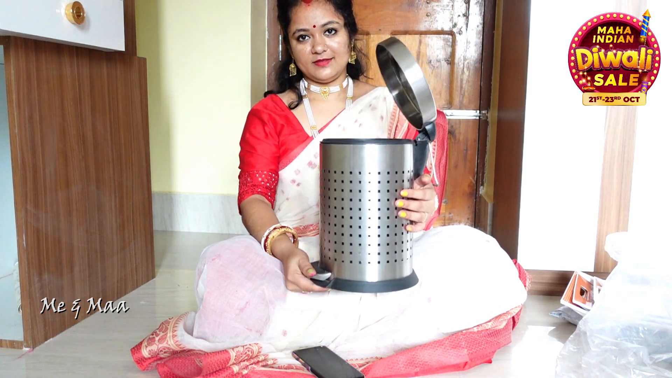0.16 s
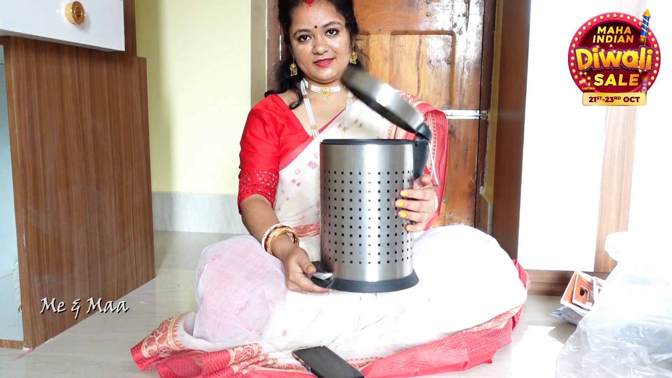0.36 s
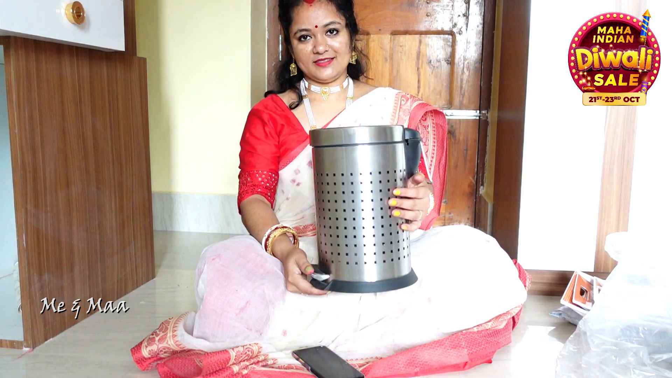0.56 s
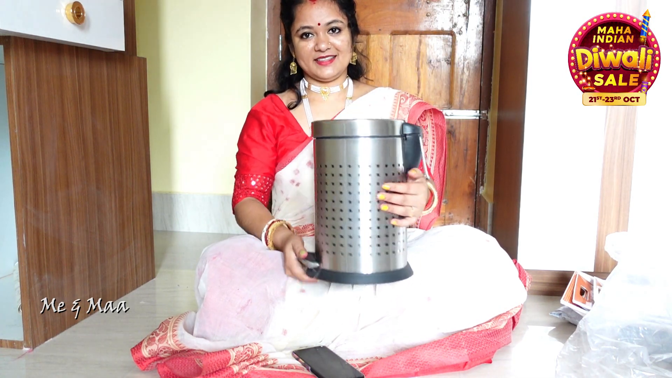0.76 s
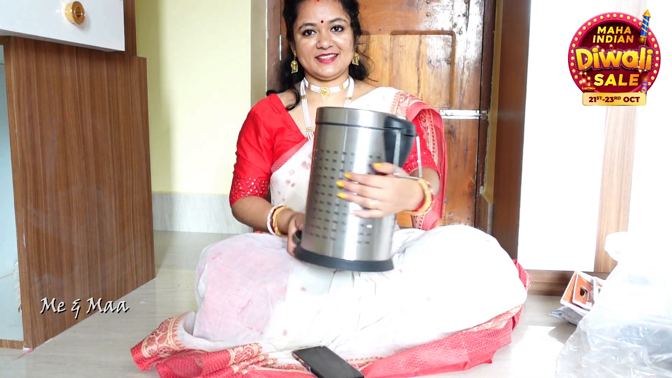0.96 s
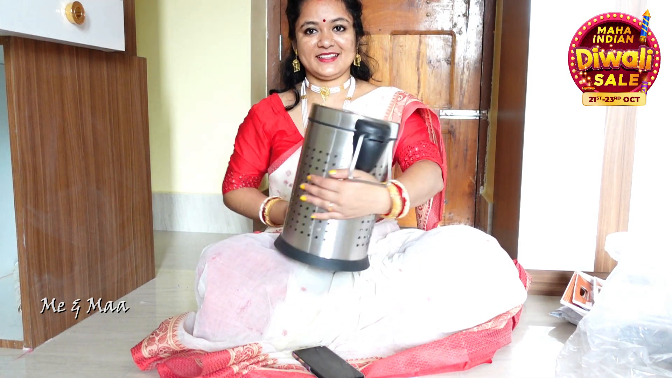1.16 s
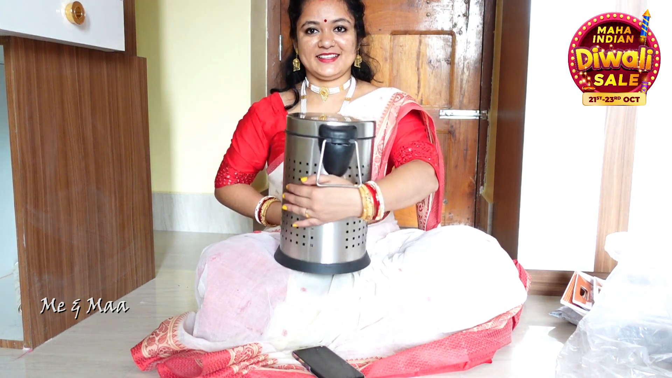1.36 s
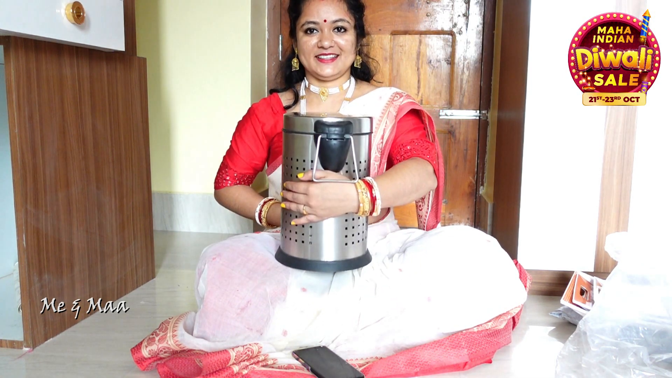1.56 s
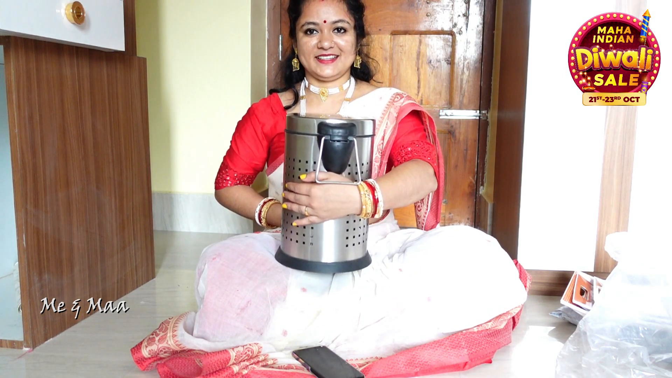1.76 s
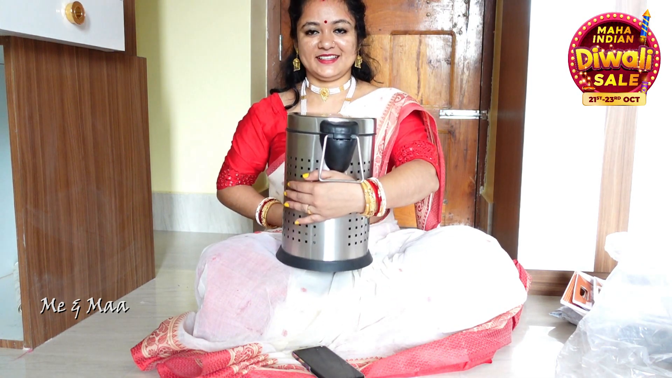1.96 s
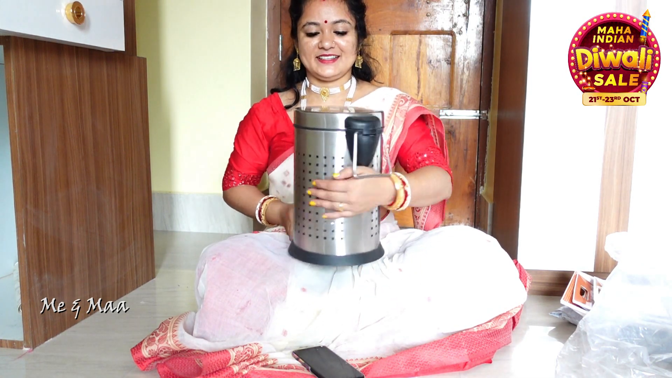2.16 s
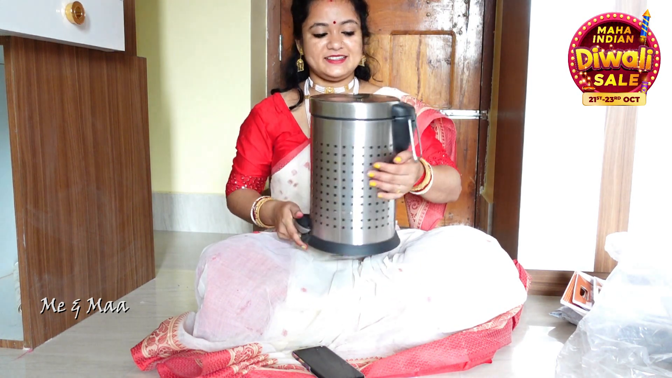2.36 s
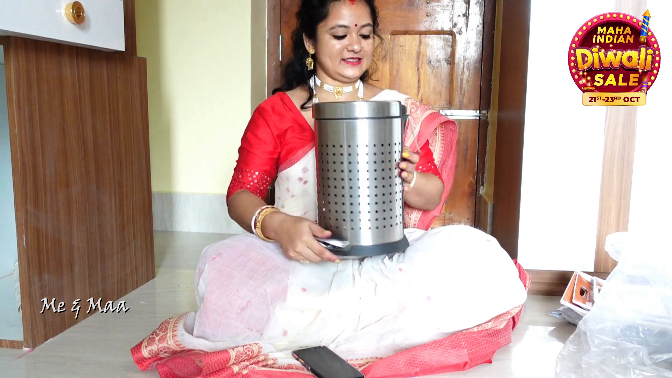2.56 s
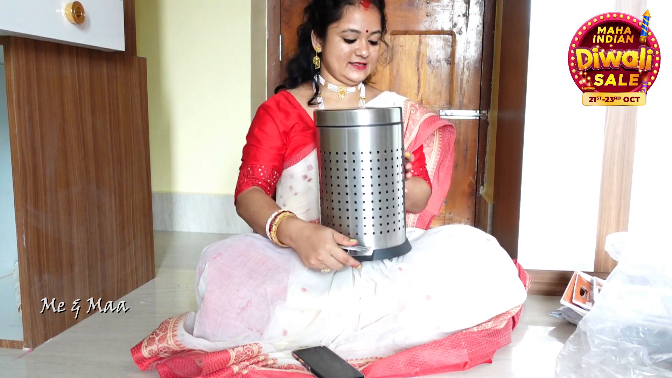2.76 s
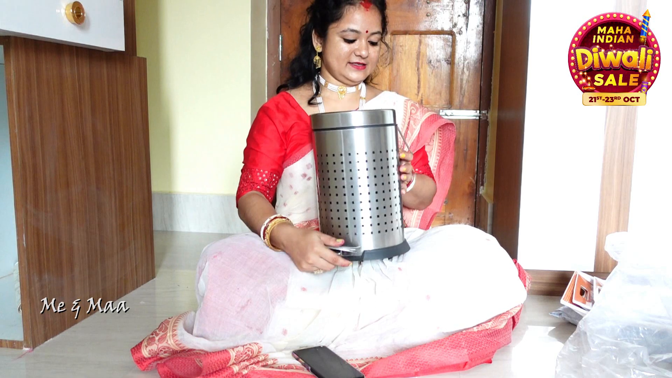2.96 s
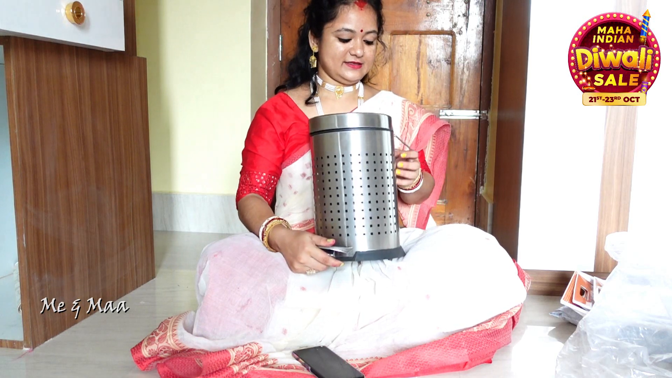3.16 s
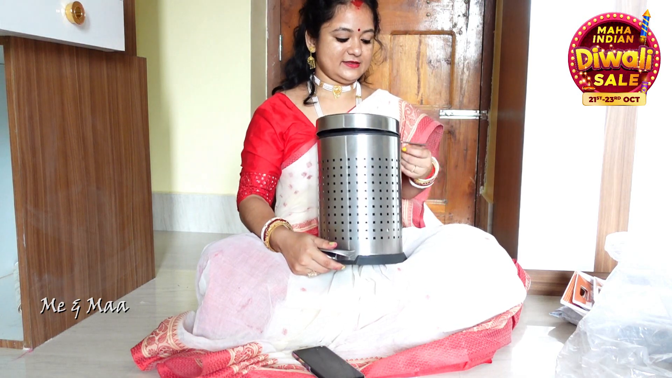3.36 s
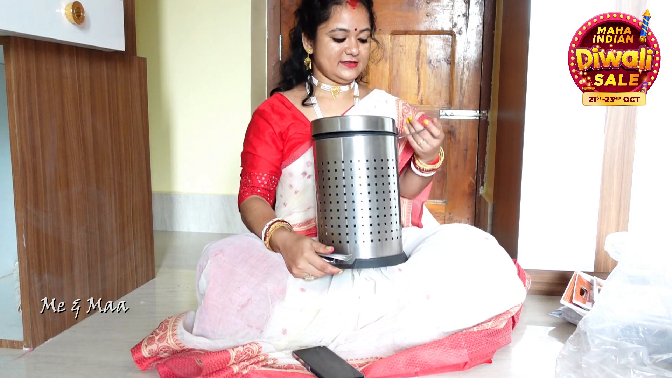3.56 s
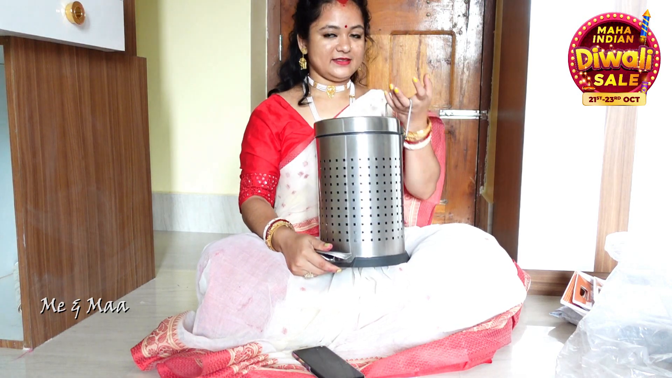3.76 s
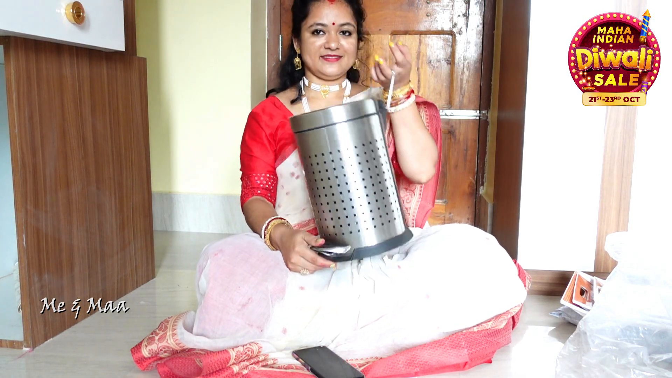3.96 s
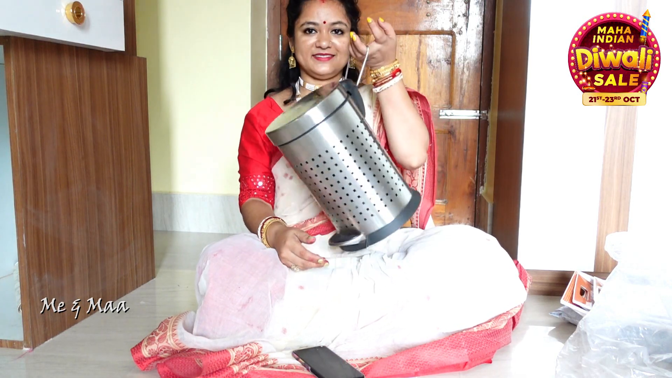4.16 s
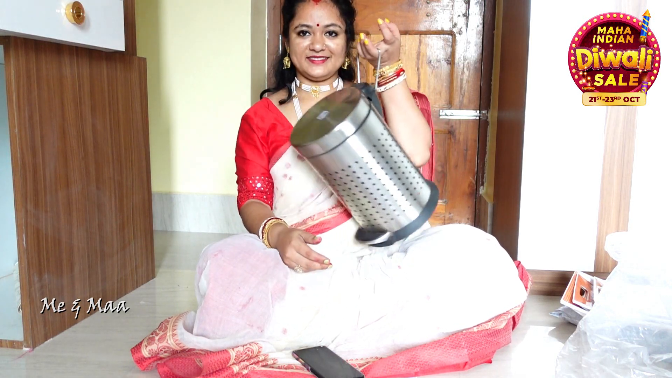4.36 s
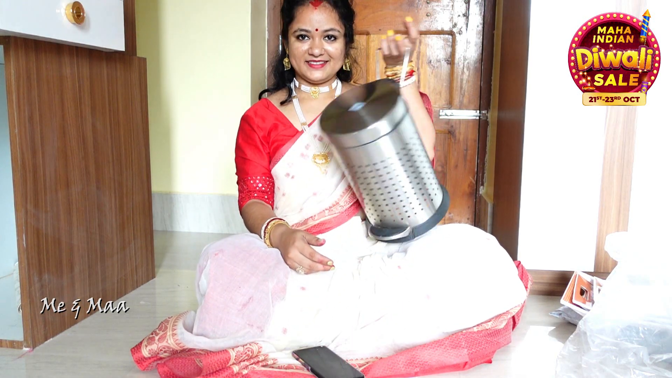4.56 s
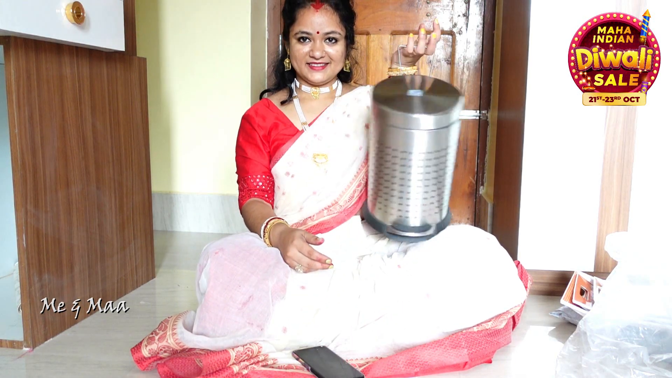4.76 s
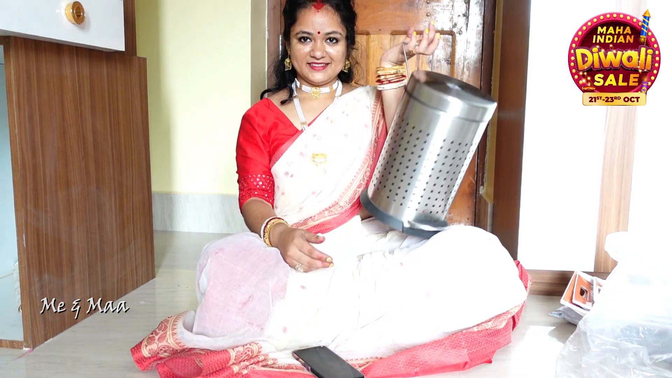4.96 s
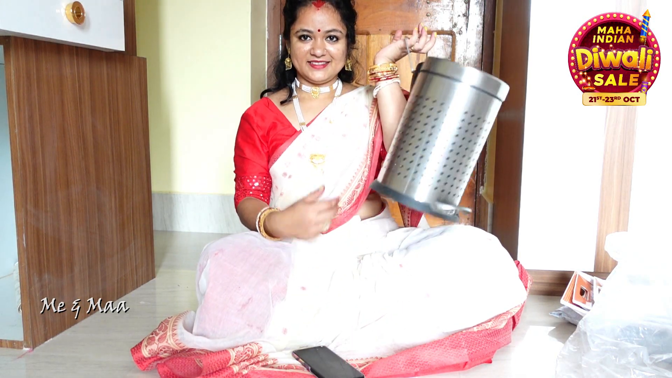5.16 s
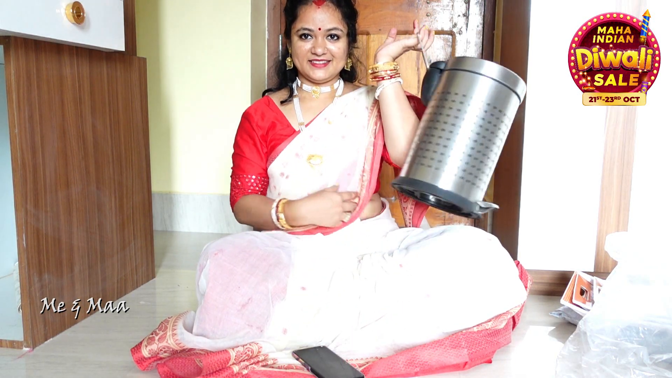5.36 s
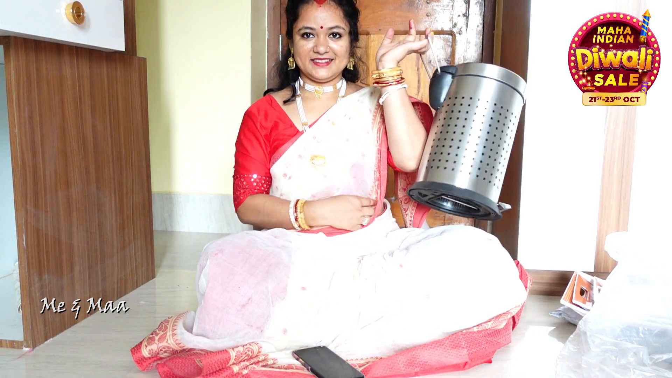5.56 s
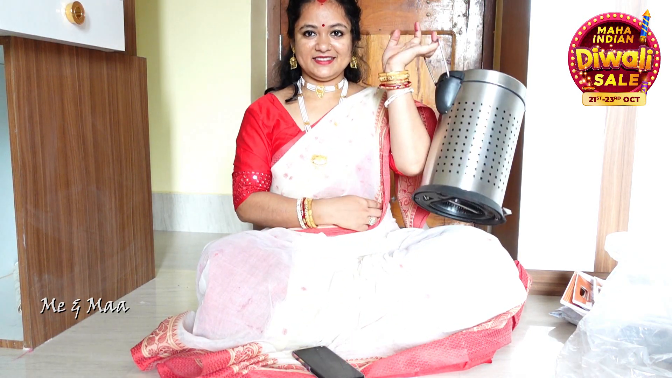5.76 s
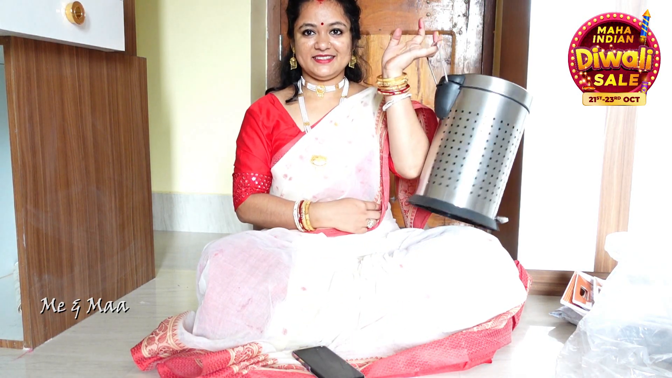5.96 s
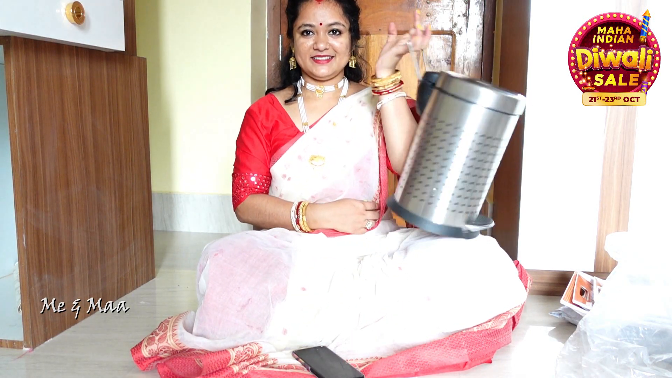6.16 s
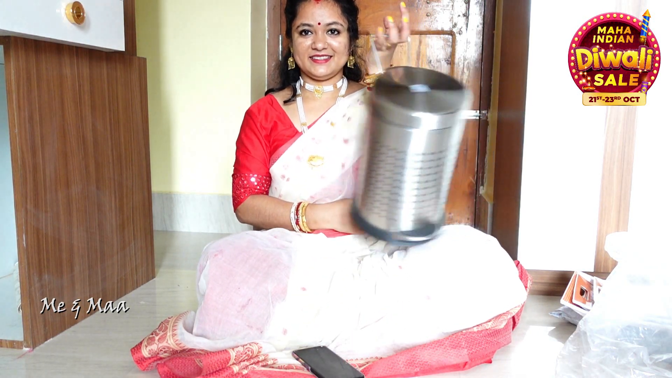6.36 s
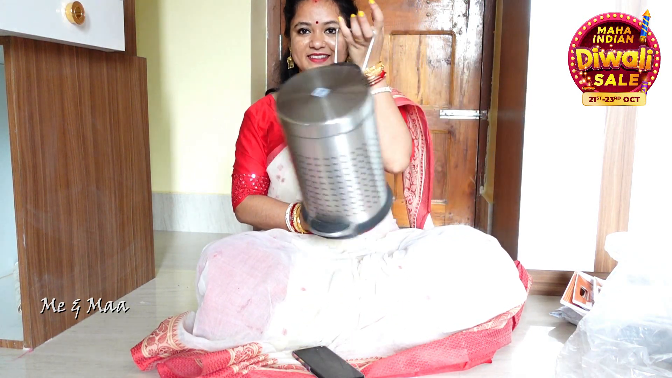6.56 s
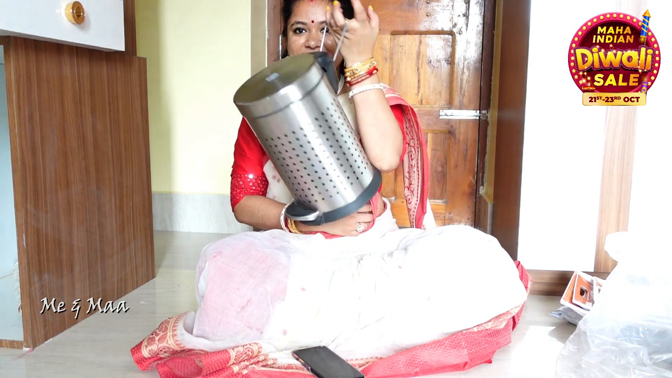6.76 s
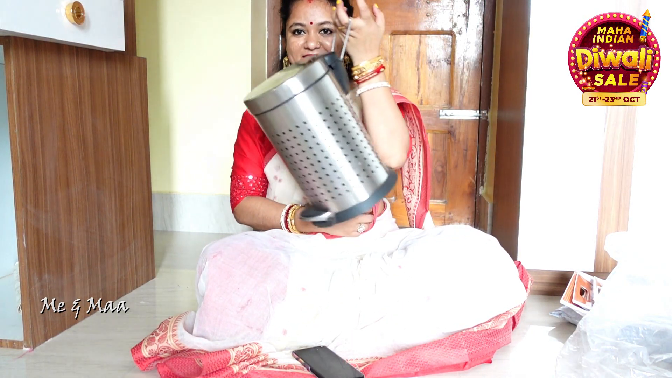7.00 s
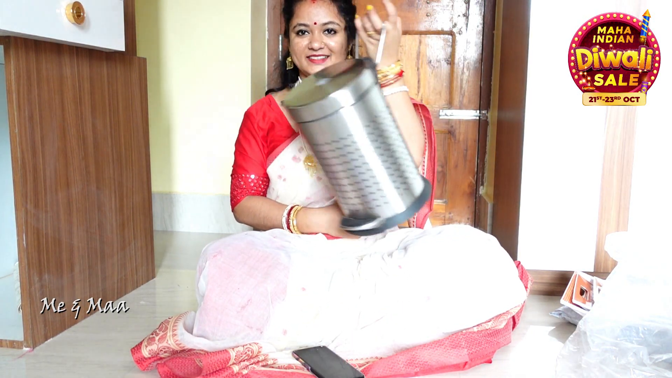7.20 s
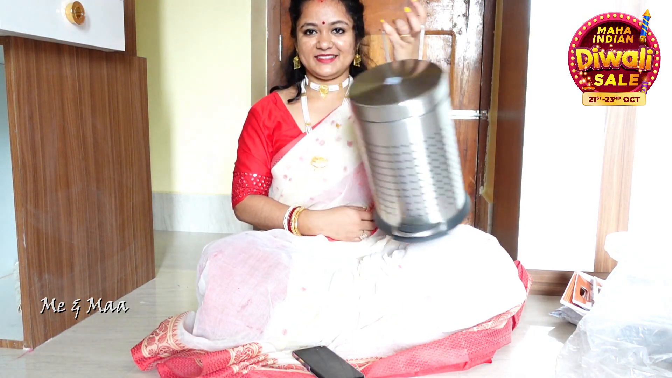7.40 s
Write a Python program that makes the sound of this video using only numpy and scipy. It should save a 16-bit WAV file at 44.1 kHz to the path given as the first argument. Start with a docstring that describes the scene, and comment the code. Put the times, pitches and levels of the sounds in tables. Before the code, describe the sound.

A steel pedal bin lid squeaks down and slams with a bright ringing clang, then hands handle the bin with light knocks, bangle ticks and distant birds.

```python
"""Steel pedal bin in a tiled room

A lid, as a bank of decaying modes, rings open, swings down squeaking, slams shut, chatters and rings out.
Hands then turn, lift and swing the bin: contacts excite shell and air resonances, skin and cloth make
coloured noise, and bangles tick as small resonators. Far birds are gliding sines and a patchy noise band,
over the steady noise of the room; decaying noise in octave bands gives the echo."""
import sys
import numpy as np
from scipy import signal
from scipy.fft import rfft, irfft, next_fast_len
from scipy.io import wavfile
from scipy.ndimage import uniform_filter1d

SR = 44100
rng = np.random.default_rng(int(sys.argv[2]) if len(sys.argv) > 2 else 0)


def generate_wav(sig):
    """Save sig (samples, or channels by samples) to the path in sys.argv[1] as 16-bit PCM at SR."""
    pcm = np.round(np.clip(np.atleast_2d(sig).T, -1, 1) * 32767).astype(np.int16)
    wavfile.write(sys.argv[1], SR, pcm)


N = 327651


def from_db(db):
    """Decibel law: 20 dB is a factor of ten in amplitude."""
    return 10 ** (np.asarray(db) / 20)


def rms_one(x):
    """Normalization to unit root mean square."""
    return x / np.sqrt(np.mean(x ** 2) + 1e-20)


def at_hz(points, hz):
    """Interpolation of a (Hz, value) table on a logarithmic frequency axis."""
    table_hz, values = np.transpose(points)
    return np.interp(np.log(hz + 1), np.log(table_hz), values)


def coloured(x, spectrum):
    """Spectral shaping: each frequency of x is scaled by a gain in dB."""
    size = next_fast_len(x.shape[-1])
    bin_hz = np.arange(size // 2 + 1) * SR / size
    shaped = rfft(x, size) * from_db(at_hz(spectrum, bin_hz))
    return irfft(shaped, size)[..., :x.shape[-1]]


def clicks(times, db):
    """Impulse excitation: one single-sample click for each time."""
    out = np.zeros(N)
    out[np.round(np.asarray(times) * SR).astype(int)] = from_db(db)
    return out


def ring(x, hz, t60):
    """Damped resonance: a unit click sets a decaying sine of height 1 ringing."""
    radius, angle = from_db(-60 / (t60 * SR)), 2 * np.pi * hz / SR
    return signal.lfilter([0, np.sin(angle)], [1, -2 * radius * np.cos(angle), radius ** 2], x + 1e-18)


def fade(x, t60):
    """Exponential decay: each click becomes an envelope that falls to a thousandth in t60."""
    return signal.lfilter([1], [1, -from_db(-60 / (t60 * SR))], x + 1e-18)


def band(x, low_hz, high_hz):
    """Band limitation by a Butterworth filter."""
    return signal.sosfilt(signal.butter(2, [low_hz, high_hz], "band", fs=SR, output="sos"), x)


def drift(rate):
    """Slow random modulation: normal draws, rate per second, joined by straight lines."""
    steps = rng.standard_normal(int(N / SR * rate) + 2)
    return np.interp(np.arange(N) / SR * rate, np.arange(len(steps)), steps)


# Spectrum of the air of the room. Each row: frequency in Hz, relative density in dB per Hz.
HUSH_SPECTRUM = [(24, -50), (40, -49), (146, -8), (266, -11), (325, -3.5), (449, -6.5), (817, 2.5),
                 (949, 0.5), (2110, -1), (2710, 0), (6810, -10.5), (14400, -26), (15500, -19)]
# Part unlike in the two channels, for hush and echo. Each row: frequency in Hz, side re mid in dB.
SIDE_SPECTRUM = [(60, -1), (180, -10), (550, -5.5), (1650, -5), (4970, -4.5), (9000, -3), (12500, -15)]
HUSH_DB = -59.5


def hush():
    """Stationary coloured noise: the steady air of the room, partly unlike in the two channels."""
    mid, side = coloured(rng.standard_normal((2, N)), HUSH_SPECTRUM)
    side = coloured(side, SIDE_SPECTRUM)
    return from_db(HUSH_DB) * np.array([mid + side, mid - side]) / np.std(mid)


# Birds too far to tell apart. Each row: time in seconds, level in dB before the mix.
CHORUS_LEVEL = [(1.7, -68), (2.1, -64.5), (2.59, -75.5), (2.94, -68), (3.36, -66.5), (4.08, -64.5),
                (4.41, -66), (5.0, -66), (5.34, -74.5), (6.12, -85), (6.4, -88), (7.43, -74)]


def chorus():
    """Narrow-band noise with a wandering level: far twitter melts into a patchy band."""
    s, db = np.transpose(CHORUS_LEVEL)
    level = from_db(np.interp(np.arange(N) / SR, s, db, left=-90) + 3.3 * drift(9))
    twitter = band(band(rng.standard_normal(N), 2530, 4230), 2530, 4230)
    return level * rms_one(twitter)


# Far whistles. Each row: start in seconds, length in seconds, first frequency in Hz,
# last frequency in Hz, level in dB before the mix.
FAR_CHIRPS = [(1.796, 0.1, 4265, 4540, -61), (1.801, 0.098, 3180, 3260, -58.5),
              (1.925, .1, 5820, 6310, -66), (1.968, 0.075, 4040, 3500, -53.5),
              (1.982, 0.066, 2770, 2624, -57), (2.632, 0.072, 3460, 2680, -64),
              (2.793, 0.13, 4290, 2940, -61.5), (2.968, 0.13, 3500, 3500, -58.5),
              (3.013, 0.062, 2790, 2607, -59), (3.061, 0.071, 4330, 2950, -57),
              (3.099, 0.3, 7620, 6240, -66), (3.329, 0.091, 3365, 3156, -55.5),
              (3.411, 0.042, 2334, 2330, -59.5), (3.472, 0.12, 3795, 3510, -56.5),
              (3.514, 0.15, 2770, 2900, -60), (3.753, .12, 3200, 3000, -59),
              (4.039, 0.062, 3480, 3560, -57), (4.138, 0.047, 2290, 2200, -61),
              (4.18, 0.052, 3870, 3880, -55.5), (4.208, 0.05, 2900, 2484, -55),
              (4.425, .05, 3710, 3600, -57.5), (4.457, 0.066, 2515, 2430, -56.5),
              (4.521, 0.11, 3800, 3580, -55), (4.596, 0.081, 3670, 3420, -65),
              (4.599, 0.048, 2750, 2580, -56), (4.93, 0.23, 7440, 7000, -69.5),
              (5.675, .14, 5920, 5840, -69.5), (5.743, 0.078, 6600, 6660, -69),
              (5.766, 0.055, 4000, 3550, -63), (5.814, 0.05, 2360, 1780, -64), (5.95, 0.2, 6830, 7020, -73),
              (6.323, 0.033, 2670, 2620, -63), (6.367, 0.065, 4160, 3640, -63.5),
              (6.407, 0.068, 2704, 2230, -59), (6.728, 0.16, 2650, 2780, -63),
              (6.774, 0.077, 3100, 3100, -64), (6.778, 0.17, 6180, 6230, -69.5),
              (6.895, 0.068, 2820, 2816, -58), (7.372, 0.071, 2810, 2774, -59),
              (7.363, 0.14, 6684, 6830, -68)]
HUSKY_HZ = 234   # top of the noise that roughens a far whistle


def birds():
    """Frequency glides with noise on their amplitude: whistles husky from leaves and walls on the way in."""
    out = np.zeros(N + SR)
    husk = 0.95 + rms_one(band(rng.standard_normal(N + SR), 13.0, HUSKY_HZ))
    for s, length, from_hz, to_hz, db in FAR_CHIRPS:
        at = round(s * SR)
        u = np.arange(round(length * SR)) / (length * SR)   # 0 to 1 along the chirp
        hz = from_hz + (to_hz - from_hz) * u
        swell = np.sin(np.pi * u) ** 0.23
        out[at:at + len(u)] += from_db(db) * swell * np.sin(2 * np.pi * np.cumsum(hz) / SR)
    return (out * husk)[:N]


# Spectrum of skin and cloth on steel. Each row: frequency in Hz, relative density in dB per Hz.
RUB_SPECTRUM = [(59, -67), (100, -44), (166, -15), (281, -6), (394, -12.5), (1290, -2), (1960, 1),
                (2270, 3), (7250, -7), (15500, -34)]
# Hands sliding on the steel. Each row: peak time in seconds, hiss level in dB, duller rub level in dB,
# length in seconds between the points STROKE_DEPTH_DB below the peak.
SLIDES = [(0.01, -53.5, -47.5, 0.59), (0.686, -53, -33.5, 0.064), (0.757, -42, -35, 0.1),
          (0.836, -36.5, -34, 0.033), (0.905, -46, -43, .13), (1.08, -44.5, -47, 0.22),
          (1.202, -58, -49, 0.27), (1.47, -64, -57, 0.13), (1.953, -61, -59, 0.39), (2.18, -55, -55, 0.057),
          (2.245, -53, -65, 0.13), (2.307, -46, -50.5, 0.14), (2.634, -52, -73, 0.38),
          (2.87, -59, -74, 0.13), (3.05, -51.5, -75, 0.27), (3.587, -55.5, -58, 0.59),
          (3.701, -68, -42, 0.12), (3.853, -53.5, -48.5, 0.18), (4.024, -48, -43, 0.11),
          (4.371, -48.5, -37.5, .13), (4.803, -51.5, -58, 0.19), (4.999, -51, -47.5, 0.27),
          (5.177, -50, -65, 0.064), (5.765, -61, -71, 0.15), (6.141, -43, -49.5, 0.1),
          (6.18, -55.5, -57.5, 0.57), (6.58, -63, -72, .1), (6.8, -54.5, -59.5, 0.54),
          (7.4, -57.5, -64, .15)]
RISE_SHARE, STROKE_DEPTH_DB = 0.34, 13.5   # RISE_SHARE: part of the length before the peak
# Cloth rustling all along. Each row: time in seconds, hiss level in dB.
CLOTH_RUSTLE = [(0, -68), (.45, -59), (1.3, -58.5), (1.72, -68.5), (2.4, -62), (3.4, -63.5), (4.6, -58.5),
                (5.6, -65), (7.43, -70)]
RUSTLE_RUB_DB = 1   # its duller part re the hiss


def handling():
    """Friction as dense tiny slips: hiss over a duller rub, each stroke swelling fast and sinking slower."""
    t = np.arange(N) / SR
    hiss_energy = from_db(np.interp(t, *np.transpose(CLOTH_RUSTLE))) ** 2
    rub_energy = hiss_energy * from_db(2 * RUSTLE_RUB_DB)
    for s, hiss_db, rub_db, length in SLIDES:
        away = np.maximum((s - t) / RISE_SHARE, (t - s) / (1 - RISE_SHARE)) / length
        swell = from_db(-2 * STROKE_DEPTH_DB * np.minimum(away, 9))
        hiss_energy = hiss_energy + from_db(2 * hiss_db) * swell
        rub_energy = rub_energy + from_db(2 * rub_db) * swell
    slip_db = 3.64 * np.minimum(rng.exponential(1, (2, N)), 4.0)
    slips = rng.standard_normal((2, N)) * from_db(slip_db)
    dull, bright = coloured(slips, RUB_SPECTRUM)
    dull = signal.sosfilt(signal.butter(2, 3500, "low", fs=SR, output="sos"), dull)
    bright = signal.sosfilt(signal.butter(2, 3500, "high", fs=SR, output="sos"), bright)
    return rms_one(dull) * np.sqrt(rub_energy) + rms_one(bright) * np.sqrt(hiss_energy)


# Bangles touching. Each row: time in seconds, level in dB before summing, pitch in Hz.
BANGLE_TOUCHES = [(0.762, -32, 7000), (0.888, -42, 10300), (3.354, -50.5, 13100), (3.834, -48, 6800),
                  (4.363, -27, 4700), (5.164, -42, 10000)]
# Modes of a bangle. Each row: frequency in Hz, t60 in seconds.
BANGLE_MODES = [(4700, .04), (6800, .04), (7700, .03), (10500, .04), (11300, .03), (13300, .03)]


def bangles():
    """Modal excitation of thin rings: a bright tick, and the mode next to the pitch rings most."""
    s, db, pitch_hz = np.transpose(BANGLE_TOUCHES)
    rings = np.zeros(N)
    for hz, t60 in BANGLE_MODES:
        octaves_off = abs(np.log2(hz / pitch_hz))
        rings += ring(clicks(s, db - 3 - 22 * octaves_off), hz, t60)
    tick = rng.standard_normal(N) * fade(clicks(s, db - 5), TICK_T60_S)
    return rings + band(tick, 4700, 11000)


# Knocks on the bin. Each row: time in seconds, level in dB before the mix, boom re that level in dB,
# brightness re that level in dB, tick frequency in Hz.
BIN_KNOCKS = [(0.488, -9.5, -49, -20.5, 1260), (0.5, -3, -34, -20.5, 1520), (0.546, -7, -36, -23, 1510),
              (0.562, -7, -37, -29, 1500), (0.581, -17, -11.5, -33, 2270), (0.598, -9.5, -37, -36, 2300),
              (0.617, -12, -21, -37, 2270), (0.698, -26, -47, -34, 2260), (0.729, -24.5, -49, -13, 2270),
              (0.829, -27, -19.5, -5, 1320), (0.905, -31, -17, -16, 2270), (1.001, -23, -26, -39, 1680),
              (1.065, -19, -64, -33, 1720), (1.095, -17.5, -31, -39, 3600), (1.12, -30, -26, -30, 1650),
              (2.185, -30, -49, -7.5, 1280), (2.2, -35, -43, -30, 3300), (2.229, -31.5, -47, -10, 3300),
              (2.249, -33, -47, -32, 3300), (2.299, -27, -47, -14, 2680), (2.345, -33, -31, -23, 1200),
              (2.495, -36, -42, -7.5, 3530), (3.408, -49, -13, -21, 2870), (3.676, -18.5, -24, -27, 2260),
              (3.721, -33, -7.5, -29, 2220), (4.012, -35.5, -15, -13, 1500), (4.335, -22, -17.5, -41, 2200),
              (4.362, -27, -17, -35, 2250), (4.846, -38, -11, -19, 3400), (4.91, -48, -8, -20, 3000),
              (4.965, -34.5, -15, -22, 2720), (5.03, -41, -15, -25, 2720), (5.553, -39.5, -27, -27, 2600),
              (6.166, -35.5, -11.5, -15, 1830), (6.221, -45.5, -6, -20, 1700)]
# The damped wall of the bin. Each row: frequency in Hz, width in Hz, relative level in dB.
SHELL_MODES = [(839, 11, -25), (1108, 81, -2.5), (2235, 43, -5.5), (2838, 82, -5), (3340, 44, -21.5),
               (3560, 68, -17), (4720, 120, -17), (5650, 85, -38), (7350, 81, -21)]
# Air in the bin. Each row: frequency in Hz, width in Hz, relative level in dB.
HOLLOW_MODES = [(180.7, 15.6, -8.5), (287, 20.7, -0.5), (555, 7.3, -13.5)]
TICK_T60_S = .009


def knocks():
    """Impact excitation: tick and short rough contact ring the damped shell, boom in the hollow and crack."""
    s, db, boom_db, bright_db, tick_hz = np.transpose(BIN_KNOCKS)
    grit = rng.standard_normal((3, N))
    contact = from_db(19.5) * clicks(s, db) + fade(clicks(s, db), 0.0093) * grit[0]
    shell, boom, ticks = np.zeros((3, N))
    for k, (hz, width, level_db) in enumerate(SHELL_MODES):
        shell += from_db(level_db) * ring(contact, hz, 3.5 / width) * (-1) ** k   # alternate signs
    for hz, width, level_db in HOLLOW_MODES:
        boom += ring(clicks(s, db + boom_db + level_db), hz, 3.5 / width)
    u = np.arange(SR // 50) / SR
    for at, level_db, hz in zip(np.round(s * SR).astype(int), db, tick_hz):
        ticks[at:at + len(u)] += from_db(level_db - 60 * u / TICK_T60_S) * np.sin(2 * np.pi * hz * u)
    bright = clicks(s, db + bright_db)
    crack_envelope = from_db(3.5) * fade(bright, TICK_T60_S) + fade(bright, 0.29)
    crack = band(crack_envelope * grit[1], 3650, 8360)
    clatter = band(fade(clicks(s, db), 0.16) * grit[2], 1140, 3230)
    body = from_db(-31.5) * shell + from_db(-4.5) * boom
    return body + from_db(-2.5) * ticks + from_db(-3.5) * crack + from_db(-6) * clatter


BRUSH_S, BRUSH_DB = .487, -23   # the falling lid first brushes the rim
HINGE_HZ, HINGE_DB, HINGE_WAVER_HZ = 6330, -61, 90


def hinge():
    """Frequency and amplitude modulation: a thin, husky squeak wavers until the lid meets the rim."""
    t = np.arange(N) / SR
    swing = np.sin(np.pi * np.clip(t / BRUSH_S, 0, 1)) ** .4
    hz = HINGE_HZ + HINGE_WAVER_HZ * drift(25)
    return from_db(HINGE_DB + 4.0 * drift(150)) * swing * np.sin(2 * np.pi * np.cumsum(hz) / SR)


TOUCH_S = .016   # between touches


def touches(start, loss_db, count=4):
    """Energy partition: a run of touches on the rim as energy clicks that sum to one."""
    k = np.arange(count)
    return clicks(start + TOUCH_S * k, -2 * loss_db * k) / np.sum(from_db(-2 * loss_db * k))


# Modes of the lid, close pairs of which beat. Each entry: frequency in Hz.
LID_MODES_HZ = [296, 630, 743, 840, 991, 1058, 1075, 1123, 1300, 1326, 1346, 1501, 1649.8, 1666.2, 1800,
                1857, 2014, 2053, 2244, 2265, 2354, 2402, 2428, 2476, 2719.5, 2741, 2830, 2939, 3237.6,
                3239.4, 3442, 3793.2, 3796.9, 4027, 4385, 4673, 5012, 5350, 6320]
# The same modes in turn. Each row: ring while open in dB, ring after the landing in dB,
# ring after the rebound in dB, t60 in seconds before a hand adds damping.
LID_RINGS = [(-82, -27, -41, 0.38), (-48, -42, -60, 1.2), (-68, -22, -33, 0.24), (-73, -20, -53, 0.34),
             (-51, -24, -29.5, 0.69), (-52.5, -30, -41, 1.63), (-54, -24, -42, 0.48), (-67, -33, -18, 0.22),
             (-64, -33, -32, 1.2), (-52, -26, -32, 1.0), (-46.5, -27.5, -30, 1.32), (-68, -14, -15, 0.33),
             (-35, -30.5, -31.5, 3.6), (-35, -28, -30, 1.9), (-67, -23, -32, 0.32), (-61, -19, -35, 0.63),
             (-28, -42.5, -66, 2.37), (-60, -45, -58, 1.4), (-44, -32, -47, 1.75), (-50, -24, -17, 0.7),
             (-61, -24, -16, 0.34), (-37, -48, -32, 1.56), (-58, -28, -19, 0.27), (-62, -44, -34, .4),
             (-38.5, -31.5, -30, 2.26), (-54, -42, -40, 2.4), (-47, -52, -44, 2.5),
             (-62, -26.5, -27.5, 0.58), (-55, -38, -38, 2.8), (-55, -38, -38, 2.8), (-43.5, -34, -51, 1.4),
             (-52, -37.5, -37.5, 2.2), (-40, -43, -43, 2.2), (-43.5, -47, -55, 1.1), (-52, -45, -63, 2.2),
             (-52.5, -46, -58, 0.93), (-49.5, -38.5, -57, 0.99), (-43, -50, -56, 0.21),
             (-57, -51, -67, 1.4)]
# All the short modes together. Each row: frequency in Hz, relative density in dB per Hz.
CRASH_SPECTRUM = [(88, -66), (150, -29), (285, -11), (668, -15.5), (1090, -7), (1200, -22), (1450, -6.5),
                  (1570, -5.5), (2310, -15), (7410, -29.5), (15500, -61)]
CRASH_DB = -16.5
LAND_S, LAND_LOSS_DB = .5, 0   # a run of touches, loss from each to the next
REBOUND_S, REBOUND_LOSS_DB = .564, 3.5   # a second run, each touch weaker
TIP_S, TIP_DB_PER_S = 0.26, 22.5   # the lid tips forward and its ring turns away
GRIPPED_S, GRIP_T60_S = 2.09, 0.6   # a hand on the lid chokes the ring with this added decay
IN_STEP_S = .538   # when the two modes of a close pair swing together


def lid():
    """Modal superposition: every touch adds energy to each mode, and the landing stops the open ring."""
    t = np.arange(N) / SR
    landing = touches(LAND_S, LAND_LOSS_DB) + clicks([BRUSH_S], 2 * BRUSH_DB)
    rebound = touches(REBOUND_S, REBOUND_LOSS_DB)
    stop_db = -600 * np.clip(t - BRUSH_S, 0, 1)
    tip_db = -TIP_DB_PER_S * np.clip(t - TIP_S, 0, 1)
    still_open = from_db(stop_db + tip_db)
    grip = from_db(-60 * np.clip(t - GRIPPED_S, 0, 9) / GRIP_T60_S)
    chatter = np.sqrt(fade(landing + rebound, 0.073))
    out, phases = np.zeros(N), rng.random(100)
    for hz, (open_db, landing_db, rebound_db, t60) in zip(LID_MODES_HZ, LID_RINGS):
        blows = from_db(2 * landing_db) * landing + from_db(2 * rebound_db) * rebound
        energy = fade(blows, t60 / 2)   # half the t60, as the square root below doubles it
        struck = np.sqrt(np.abs(uniform_filter1d(energy, size=64)))
        height = from_db(open_db - 60 * t / t60) * still_open + struck
        phase = phases[int(hz // 100)]   # close pairs share a phase
        jolts = 0.18 * chatter * drift(39.7)   # touches knock the phase about
        shimmer = from_db(1.2 * drift(4))   # the bin turns, each mode beams elsewhere
        out += shimmer * height * np.sin(2 * np.pi * (hz * (t - IN_STEP_S) + phase + jolts))
    noise = rms_one(coloured(rng.standard_normal(N), CRASH_SPECTRUM))
    crash = from_db(CRASH_DB + 2.7 * drift(160)) * chatter * noise
    return out * grip + crash


# Decay of the echo. Each row: frequency in Hz, t60 in seconds.
ECHO_T60 = [(150, 0.77), (1000, 0.47), (3000, 0.32), (8000, 0.17), (15000, 0.46)]


def room(x):
    """Reverberation as decaying noise per octave: a common tail and one of opposite sign in the channels."""
    t = np.arange(SR // 2) / SR
    white, tail = rng.standard_normal((2, len(t))), 0
    for hz in 88 * 2. ** np.arange(8):
        weight = from_db([[0], [at_hz(SIDE_SPECTRUM, hz)]])
        octave = band(white, hz / np.sqrt(2), hz * np.sqrt(2))
        tail = tail + weight * octave * from_db(-60 * t / at_hz(ECHO_T60, hz))
    tail *= np.clip(t / 0.0013, 0, 1) / np.sqrt(np.sum(tail[0] ** 2))   # common tail has unit energy
    mid, side = signal.fftconvolve(x[None], tail, axes=1)[:, :N]
    return np.array([mid + side, mid - side])


RING_ECHO_DB = -15   # level of the lid's ring sent into the echo; kept low so that close pairs beat clearly


def scene():
    """Superposition of direct sound, echo and hush, slightly stronger in the second channel."""
    ringing = lid()
    contacts = knocks() + bangles() + handling() + hinge()
    far = birds() + chorus()
    small = signal.butter(3, 165, "high", fs=SR, output="sos")   # a small body radiates no deep bass
    ringing, contacts = signal.sosfilt(small, [ringing, contacts])
    echo = room(from_db(RING_ECHO_DB) * ringing + from_db(-5.5) * contacts + from_db(4.5) * far)
    direct = ringing + contacts + from_db(7.0) * far
    return (direct + echo + hush()) * from_db([[-.55], [.55]])


CUTOFF_HZ = 15750   # 45 dB down from here up


def record(dry):
    """Saturation and band limits of a small microphone: peaks rounded, no deep bass, the top cut."""
    rounded = 0.81 * np.tanh(dry / 0.79)
    thin = signal.sosfilt(signal.butter(3, 100, "high", fs=SR, output="sos"), rounded)
    return signal.sosfilt(signal.cheby2(16, 45, CUTOFF_HZ, fs=SR, output="sos"), thin)


dry = scene()
out = record(dry)
generate_wav(out)
```